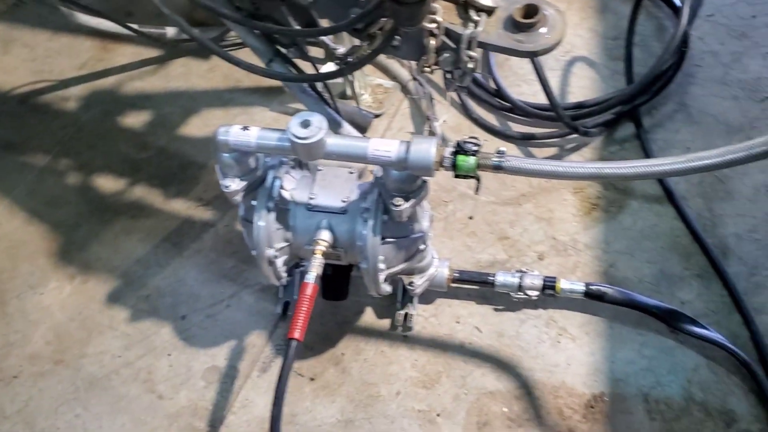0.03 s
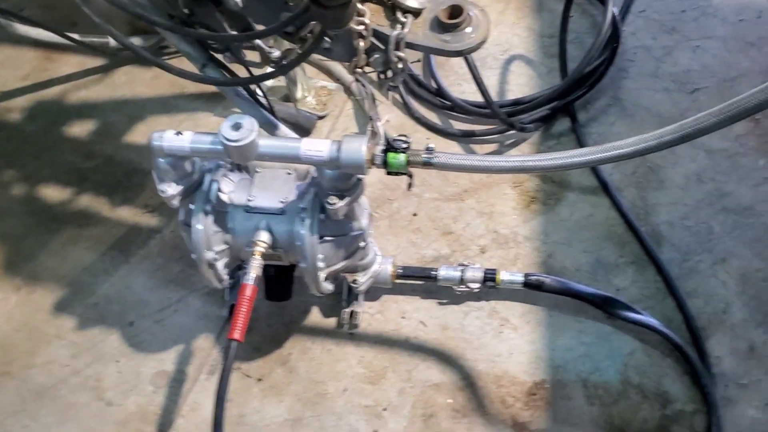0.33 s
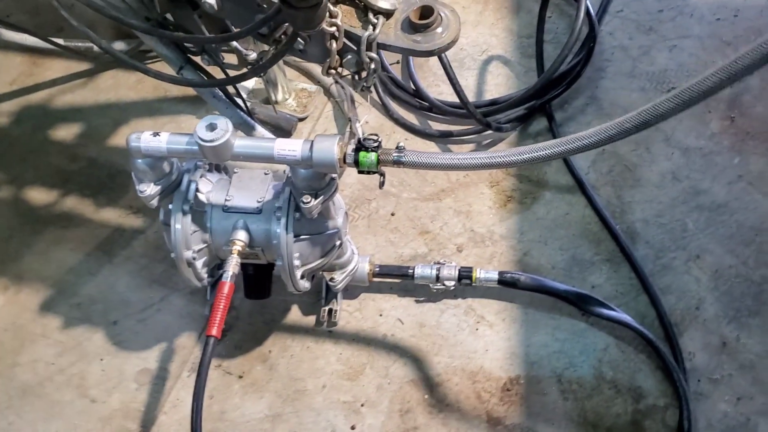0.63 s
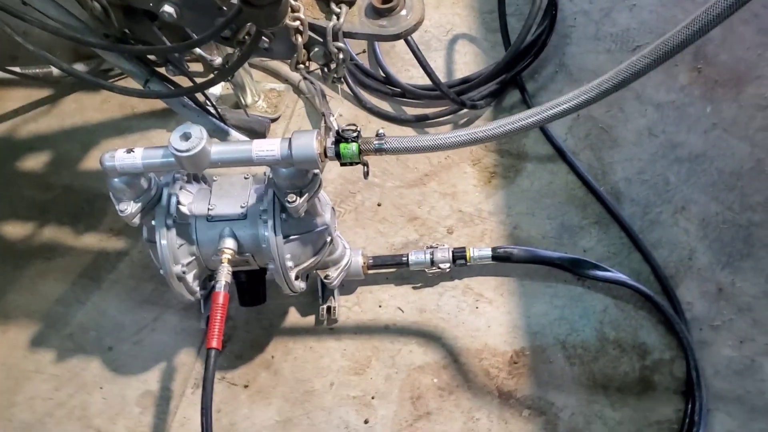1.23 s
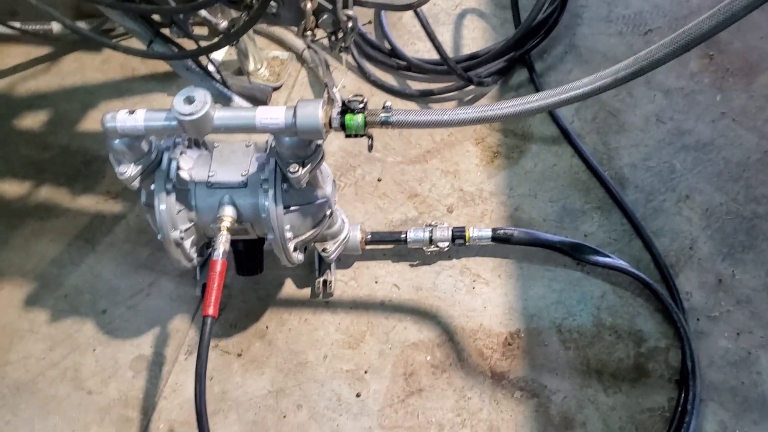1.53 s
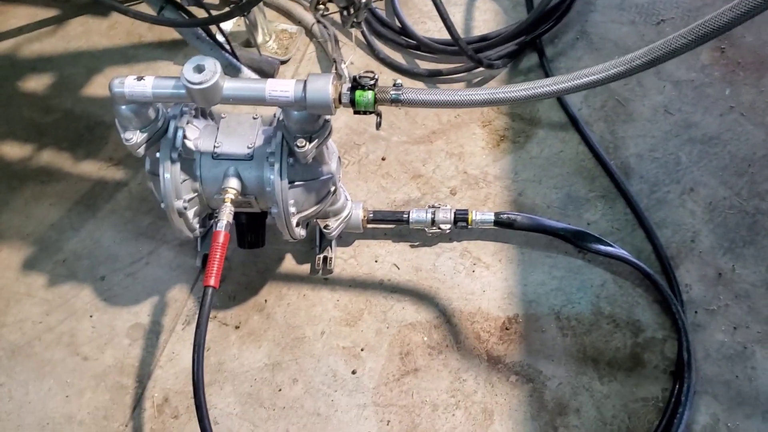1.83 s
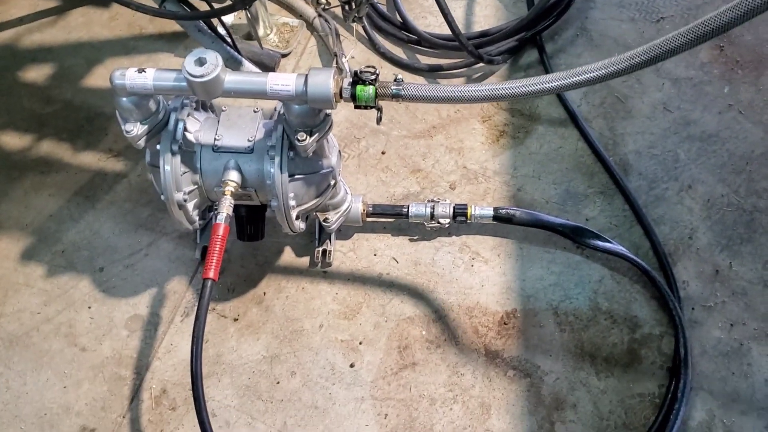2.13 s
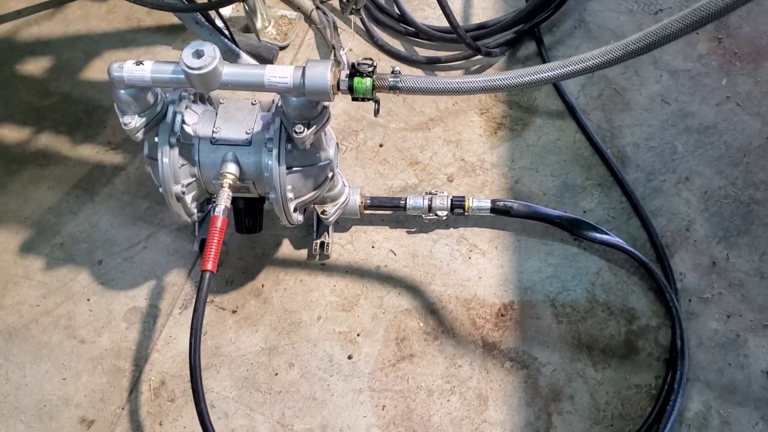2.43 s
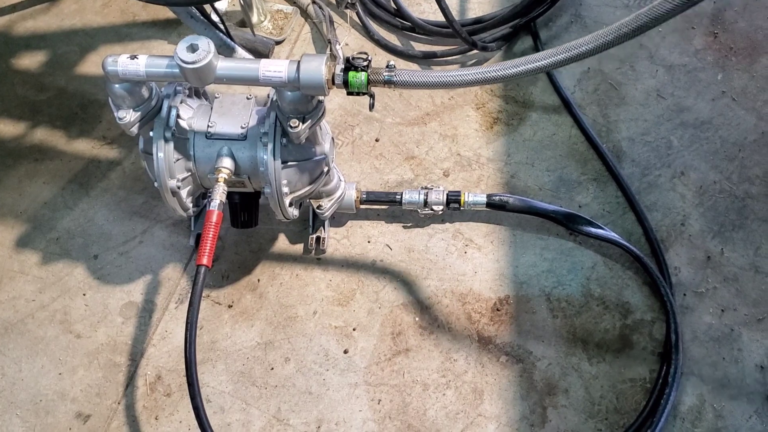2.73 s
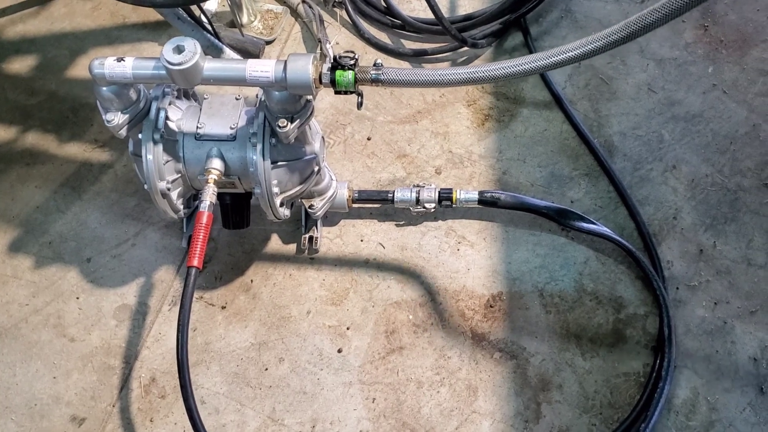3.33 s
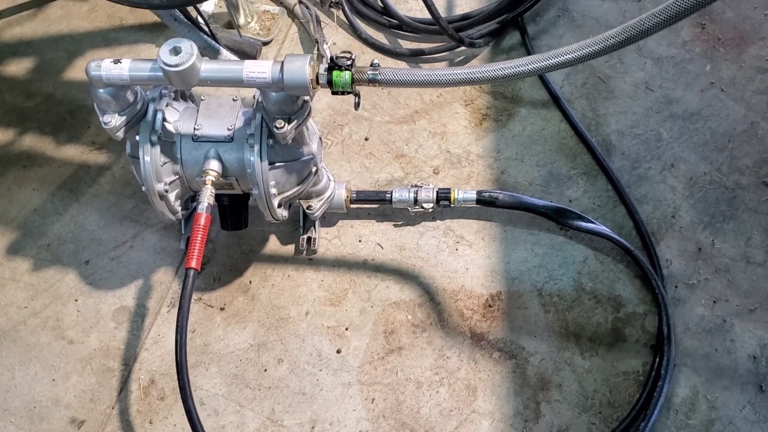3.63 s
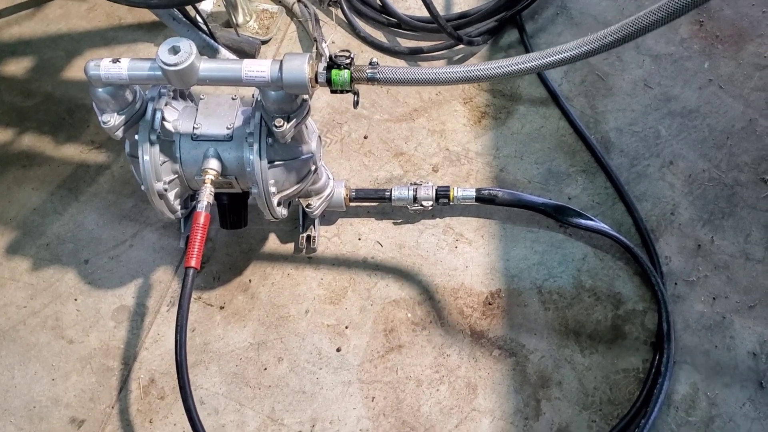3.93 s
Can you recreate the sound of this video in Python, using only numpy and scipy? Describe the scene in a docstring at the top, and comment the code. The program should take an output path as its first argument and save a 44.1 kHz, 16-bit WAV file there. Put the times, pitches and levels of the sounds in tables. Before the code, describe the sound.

Sharp, regular air puffs from a diaphragm pump, with a low engine drone underneath.

```python
"""An air compressor's engine drones steadily over a bed of rumble and hiss, while an air-driven
diaphragm pump puffs away on a concrete floor nearby. At each stroke the air valve whistles briefly
as it shifts, then one of two chambers dumps its air through the muffler, the diaphragm thumps
and the hiss dies away in the workshop. A fast limiter ducks the drone under every puff."""
import sys
import numpy as np
from scipy import signal
from scipy.fft import rfft, irfft
from scipy.io import wavfile
from scipy.ndimage import uniform_filter1d

SR = 44100
rng = np.random.default_rng(int(sys.argv[2]) if len(sys.argv) > 2 else 0)


def int16_out(signal):
    """Quantize to a 16-bit WAV file."""
    q = np.round(np.clip(np.atleast_2d(signal).T, -1, 1) * 32767)
    wavfile.write(sys.argv[1], SR, q.astype(np.int16))


N = 176400
TIME = np.arange(N) / SR
FREQS = np.maximum(np.arange(N // 2 + 1) * SR / N, 1)

# Levels are relative within each table; a pair of levels is first chamber, second chamber.
# engine partials: multiple of the cycle rate, level/dB
ENGINE_PARTIALS = [(2, -50), (4, -26.7), (8, -36), (9, -41), (10, -38), (11, -34), (12, -17.3), (13, -41),
                   (14, -25), (16, -30), (18, -26), (20, -34), (22, -29), (23, -29), (24, -40), (25, -29),
                   (26, -36), (27, -41), (28, -33), (29, -29), (30, -41), (31, -28), (32, -34), (33, -39),
                   (34, -29), (35, -41), (36, -42), (37, -32.5), (38, -39), (39, -32), (40, -31), (41, -41),
                   (42, -36), (43, -35), (45, -42), (47, -43), (48, -41)]
# spectrum of the rumble and air hiss: f/Hz, level/dB
BED_SPECTRUM = [(20, -28), (40, -31), (65, -11), (100, -8), (160, -3), (300, 8), (600, 3.5), (1000, -2),
                (1400, -1), (2300, -8.5), (3500, -14.5), (6500, -16), (8400, -20), (10000, -21),
                (15000, -29)]
# pump strokes, chambers in turn: t/s, level/dB, brightness/(dB/octave), ring level/dB, ring delay/s
STROKES = [(-.095, 1, 0, -21, 0.033), (0.217, 0, 0, -16, .062), (0.631, 2, 0, -15.5, 0.054),
           (.957, 1.5, -0.5, -17.5, .06), (1.337, 3, -1, -17.5, 0.05), (1.661, 1, -0.5, -18, 0.056),
           (2.039, 2, -0.5, -16.5, 0.049), (2.379, 1, 0, -18, 0.04), (2.774, 2.5, -1, -19, 0.052),
           (3.086, 1, -1, -16.5, 0.062), (3.472, 2.5, 0, -18, .058), (3.797, 1, -0.5, -19, 0.052)]
# resonances of the valve gap: f/Hz, width/Hz, level/dB
WHISTLE_PEAKS = [(8720, 240, 3.5), (10200, 680, -10), (11500, 300, -3), (13300, 250, -7)]
# spectrum of the escaping air: f/Hz, level/dB
JET_SPECTRUM = [(200, -29.5), (600, -6.5), (1300, -7), (1900, -2), (2700, -4), (4700, -5.5), (5900, -3.5),
                (7500, -1.5), (10000, 0), (12800, -6), (13900, -8.5), (15500, -9)]
# first spit of air through the opening port: f/Hz, width/Hz, level/dB, level/dB
SPIT_PEAKS = [(8400, 380, -14, -1), (10280, 1100, -1, -11), (11590, 540, -2, 2.5), (13040, 2100, 3, 1)]
# muffler resonances, boosting or cutting the jet: f/Hz, width/Hz, level/dB, level/dB
MUFFLER_EQ = [(1870, 180, 7, 7), (2390, 67, 1.5, 6.5), (2680, 40, 11, 10), (3160, 200, -12, -3.5),
              (3360, 120, 8.5, 6), (3620, 160, -3.5, -0.5), (3970, 330, 6, 7), (5080, 230, 1.5, 2.5),
              (5850, 200, -4, -5), (8300, 400, 0, 1)]
# the muffler's ring late in each puff: f/Hz, width/Hz, level/dB, level/dB
MUFFLER_RINGS = [(1300, 74, -11, -6), (1720, 140, -2, -1), (2400, 110, 1, -5), (2650, 80, -13, -3),
                 (3020, 97, -6, -2), (3300, 120, -1, -4.5), (4060, 140, 3, 1.5), (8300, 900, -12, -11)]
# spectrum of the workshop reverb: f/Hz, level/dB
REVERB_SPECTRUM = [(300, 9.5), (1500, 9.5), (2200, 8), (2750, 8), (3300, 5), (4500, 2.5), (5300, 5.5),
                   (6200, 4), (7600, 8), (8300, 8.5), (9000, 3), (11500, -3), (15500, -38)]
# pump body and pipes ringing on between strokes: f/Hz, width/Hz, boost/dB
PIPE_RINGS = [(2420, 130, 5.5), (2830, 110, 6.5), (5300, 200, 5), (8370, 180, 3.5)]


def from_db(db):
    """Decibels to gain."""
    return 10 ** (np.asarray(db) / 20)


def colour(points):
    """An EQ curve through (f/Hz, level/dB) points, as gain at every frequency."""
    hz, db = np.transpose(points)
    return from_db(np.interp(np.log(FREQS), np.log(hz), db))


def bell(hz, width):
    """The bell curve of one resonance, 1 at its peak."""
    return 1 / (1 + (2 * (FREQS - hz) / width) ** 2)


def noise(gain):
    """Steady noise shaped by a gain per frequency; rms 1."""
    shaped = irfft(rfft(rng.standard_normal(N)) * gain, N)
    return shaped / np.sqrt(np.mean(shaped ** 2) + 1e-20)


def resonant_noise(peaks, column=0):
    """Noise sounding through a table of resonances, using one of its level columns; rms 1."""
    return noise(sum(from_db(levels[column]) * bell(hz, width) for hz, width, *levels in peaks))


def drift(rate_hz):
    """Random wander, mostly slower than the given rate; rms 1."""
    return noise(1 / (1 + (FREQS / rate_hz) ** 2))


def swell(centre_s, length_s):
    """A smooth rise and fall."""
    return np.exp(-((TIME - centre_s) / length_s) ** 2)


def compressor():
    """The drone: engine partials on one slightly unsteady cycle, the upper ones rougher, plus mains hum."""
    cycle_hz, jitter_s, flutter_hz, engine_db = 24.704, .00008, 4.8, -.68
    hum_hz, hum_db = 120.1, -36.5
    turns = cycle_hz * (TIME + jitter_s * drift(rate_hz=3.8))
    engine = np.zeros(N)
    for multiple, db in ENGINE_PARTIALS:
        phase = 2 * np.pi * (multiple * turns + rng.random())
        roughness = .02 + .18 * multiple / ENGINE_PARTIALS[-1][0]
        tone = (1 + roughness * drift(flutter_hz)) * np.cos(phase)
        phase_flutter = roughness * drift(flutter_hz) * np.sin(phase)
        engine += from_db(engine_db + db) * (tone + phase_flutter)
    hum = from_db(hum_db) * np.sin(2 * np.pi * hum_hz * TIME)
    return np.sqrt(2) * (engine + hum)   # tone levels are rms


def noise_bed():
    """Steady rumble and air hiss under everything."""
    return from_db(-23.5) * noise(colour(BED_SPECTRUM))


def valve():
    """Air whistles through the gap as the valve shifts; a leak peaks just as the port opens."""
    whistle_db, lead_s = -34, .0047
    leak_db, leak_s = -26, .008
    whistling = sum(swell(start - lead_s, length_s=.03) for start, *_ in STROKES)
    leaking = sum(np.exp(-np.abs(TIME - start) / leak_s) for start, *_ in STROKES)
    whistle = from_db(whistle_db) * whistling * resonant_noise(WHISTLE_PEAKS)
    leak = from_db(leak_db) * leaking * noise(colour(JET_SPECTRUM))
    return whistle + leak


def exhaust(chamber):
    """A chamber's air spits, then bursts through the ringing muffler; the hiss dulls as pressure drops."""
    attack_s, hold_s, pivot_hz = .0098, .0046, 5000
    jet_db, jet_fall_db_per_s, dulling_db_per_s = -3.5, 157, 4.5   # dulling: extra fall per octave
    spit_db, spit_fall_db_per_s = -8, 231
    muffler = from_db(sum(boosts[chamber] * bell(hz, width) for hz, width, *boosts in MUFFLER_EQ))
    jet = rfft(noise(colour(JET_SPECTRUM) * muffler))
    spit = resonant_noise(SPIT_PEAKS, chamber)
    ring = resonant_noise(MUFFLER_RINGS, chamber)
    ring *= from_db(.5 * drift(rate_hz=130))   # a faint rattle
    # half-octave bands let the treble fade first
    octaves = np.arange(-3, 2.1, .5)
    crossovers = [np.interp(np.log2(FREQS / pivot_hz), octaves, row) for row in np.eye(len(octaves))]
    bands = [irfft(jet * crossover, N) for crossover in crossovers]
    puffs = np.zeros(N)
    for start, db, brightness, ring_db, ring_delay in STROKES[chamber::2]:
        active = (TIME > start) & (TIME < start + .5)
        age = TIME[active] - start
        puff = spit[active] * from_db(spit_db - spit_fall_db_per_s * age)
        puff += ring[active] * from_db(ring_db) * swell(start + ring_delay, length_s=.026)[active]
        for octave, band in zip(octaves, bands):
            fade_db = (jet_fall_db_per_s + dulling_db_per_s * octave) * np.maximum(age - hold_s, 0)
            puff += band[active] * from_db(jet_db + brightness * octave - fade_db)
        attack = np.minimum(age / attack_s, 1)
        puffs[active] += from_db(db) * attack * puff
    return puffs


def diaphragm():
    """Two soft, low thumps as the stroke reverses, the second one fainter."""
    thump_hz = 64
    thumps = np.zeros(N)
    for start, *_ in STROKES:
        for delay_s, db in (.008, -26), (.08, -36):
            tone = np.sin(2 * np.pi * (thump_hz * TIME + rng.random()))
            thumps += from_db(db) * swell(start + delay_s, length_s=.013) * tone
    return thumps


def workshop():
    """Diffuse reverb blooms and dies after each puff, coloured by the ringing metal."""
    reverb_db, bloom_s, fall_db_per_s = -16, .035, 68.5
    power = np.zeros(N)
    for start, db, *_ in STROKES:
        age = np.maximum(TIME - start, 0)
        bloom = np.minimum(age / bloom_s, 1)
        power += (bloom * from_db(db - fall_db_per_s * age)) ** 2
    metal = from_db(sum(db * bell(hz, width) for hz, width, db in PIPE_RINGS))
    return from_db(reverb_db) * np.sqrt(power) * noise(colour(REVERB_SPECTRUM) * metal)


def scene():
    """Drone, noise bed, pump and reverb, all panned centre."""
    backdrop = compressor() + noise_bed()
    pump = valve() + exhaust(chamber=0) + exhaust(chamber=1) + diaphragm()
    mono = backdrop + pump + workshop()
    return np.stack([mono, mono])


def record(dry):
    """A fast limiter ducks the mix, stray peaks clip, and the deep bass and extreme top are cut."""
    threshold_db, release_db_per_s = -10.5, 206
    window_s, lookahead_s, smooth_s = .01, .004, .0015
    low_cut_hz, high_cut_hz = 45.4, 15550
    power = uniform_filter1d(dry[0] ** 2, int(window_s * SR))
    level_db = 10 * np.log10(np.maximum(power, 1e-12))
    over_db = np.maximum(level_db - threshold_db, 0)
    release_ramp = release_db_per_s * TIME
    held_db = np.maximum.accumulate(over_db + release_ramp) - release_ramp   # grab, then ease off
    pole = np.exp(-1 / (smooth_s * SR))
    smooth_db = signal.lfilter([1 - pole], [1, -pole], held_db)
    duck_db = np.interp(TIME + lookahead_s - window_s / 2, TIME, smooth_db)
    limited = np.clip(dry * from_db(-duck_db), -1, 1)
    low_cut = signal.butter(8, low_cut_hz, "high", fs=SR, output="sos")
    high_cut = signal.ellip(16, .1, 80, high_cut_hz, fs=SR, output="sos")
    return signal.sosfilt(high_cut, signal.sosfilt(low_cut, limited))


dry = scene()
out = record(dry)
int16_out(out)
```